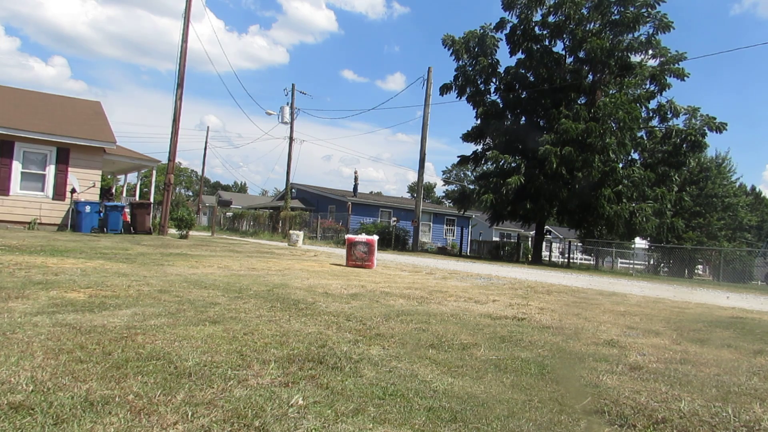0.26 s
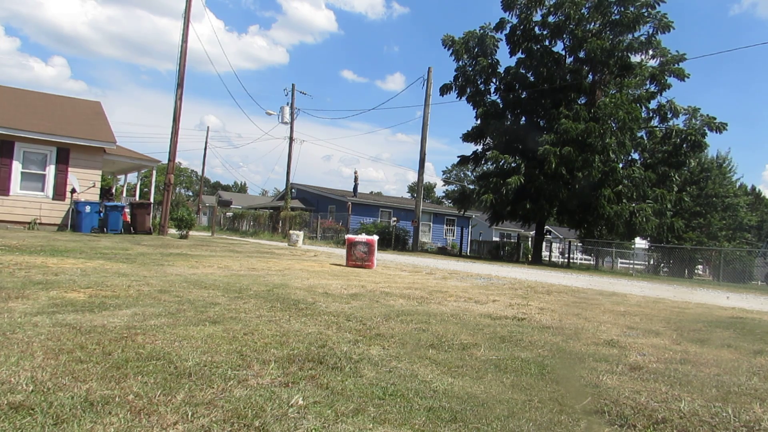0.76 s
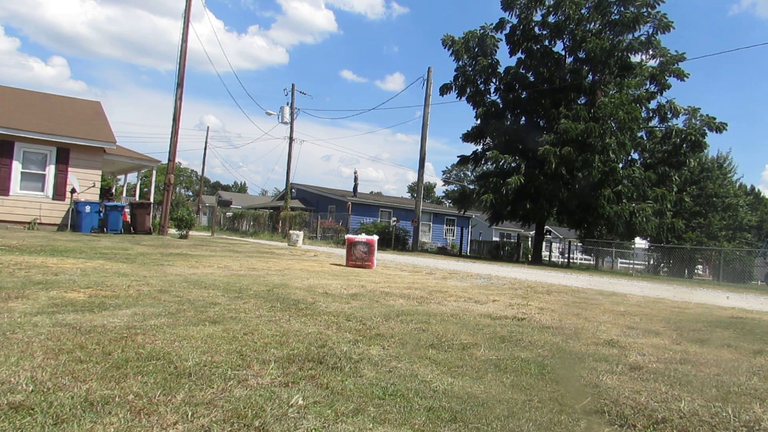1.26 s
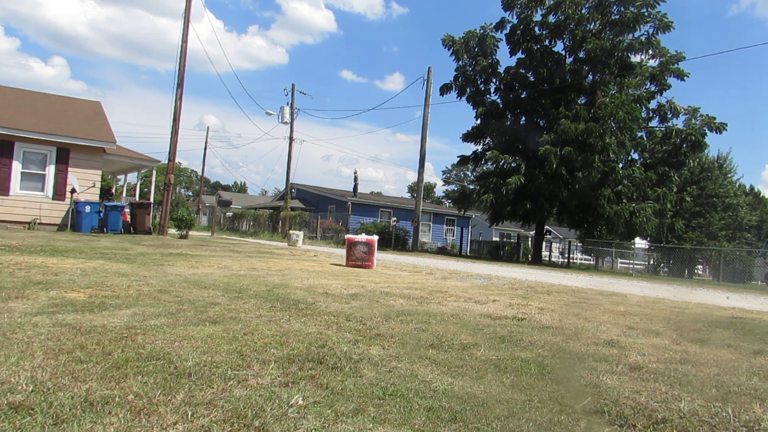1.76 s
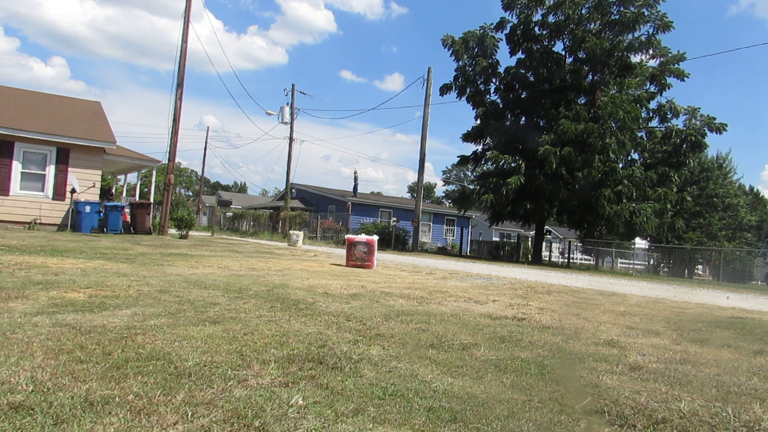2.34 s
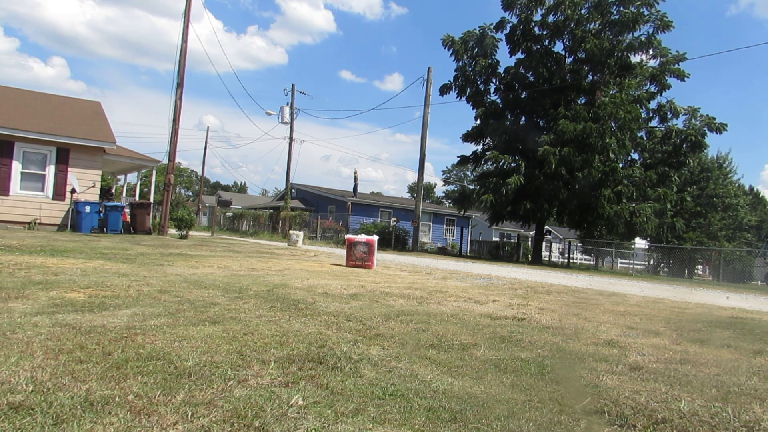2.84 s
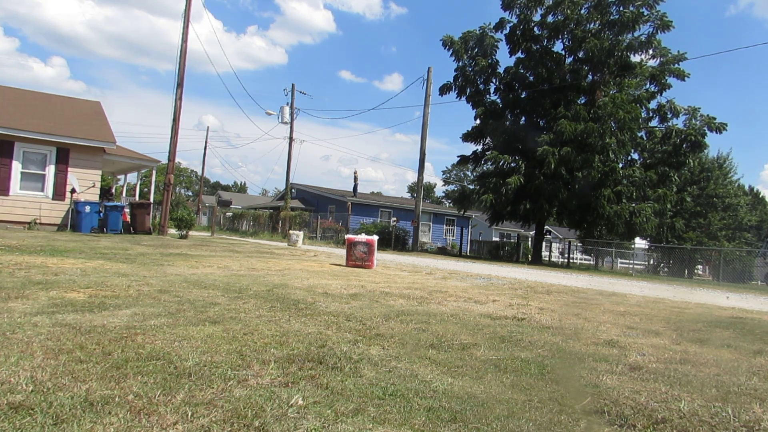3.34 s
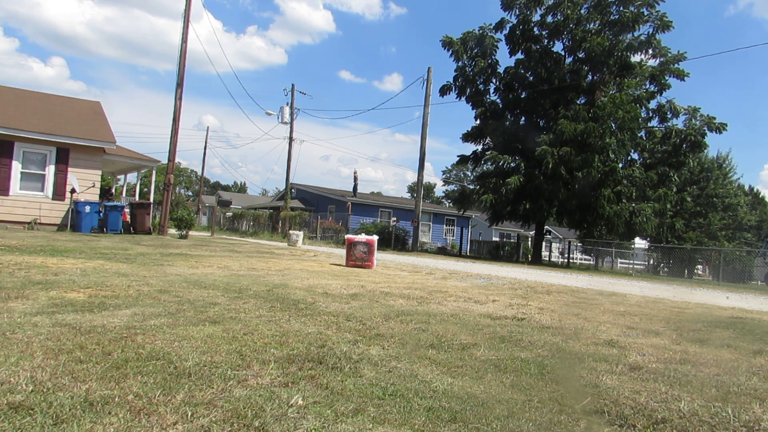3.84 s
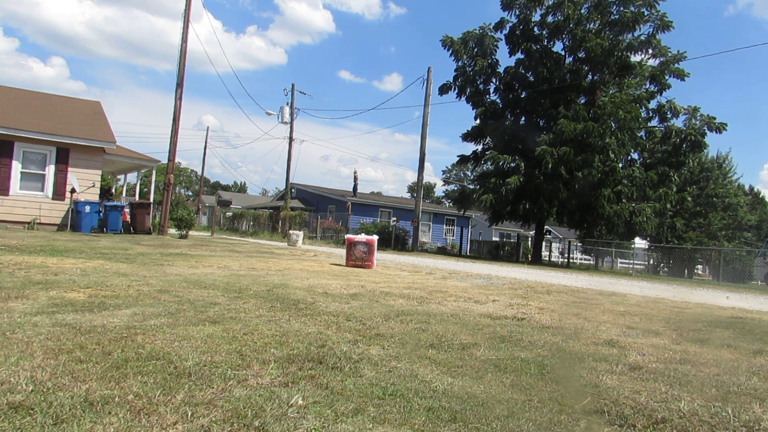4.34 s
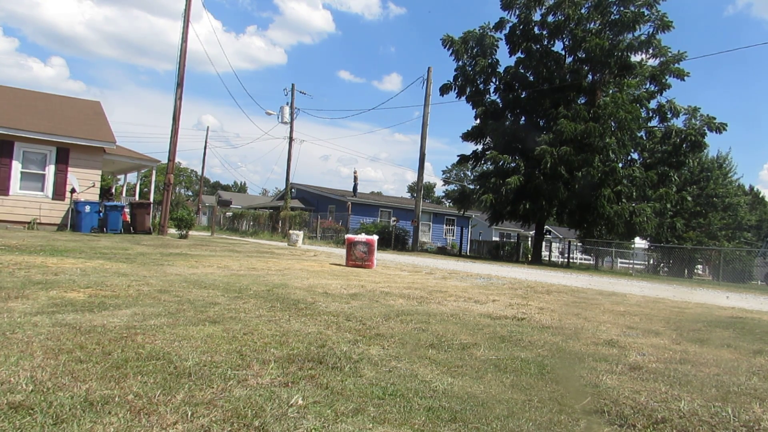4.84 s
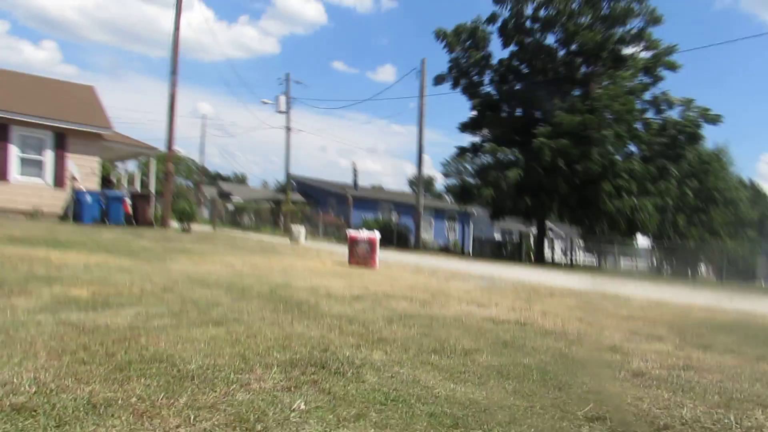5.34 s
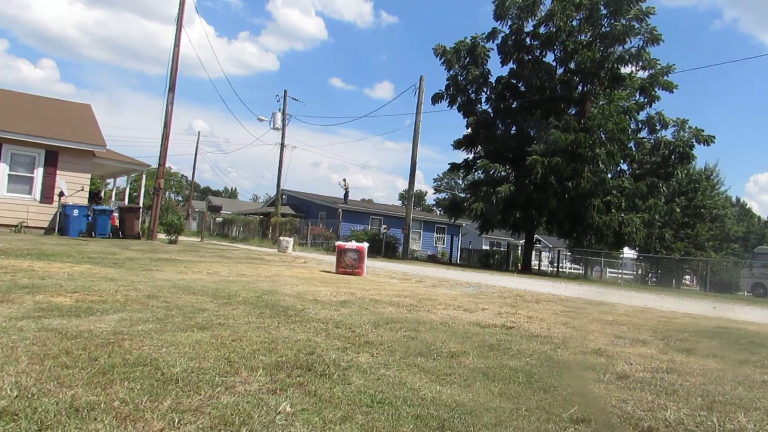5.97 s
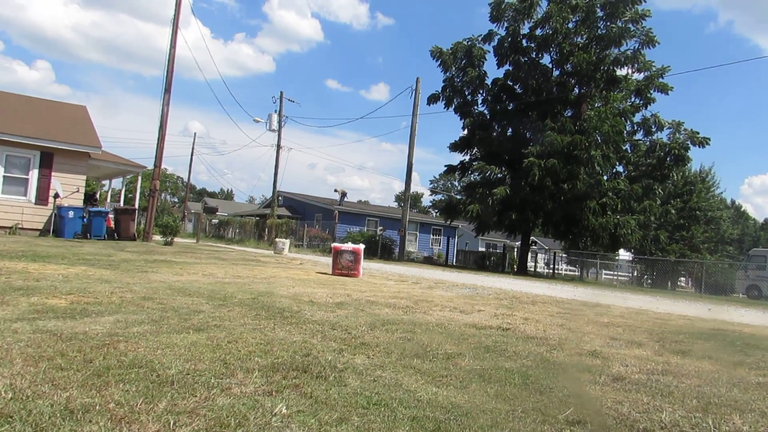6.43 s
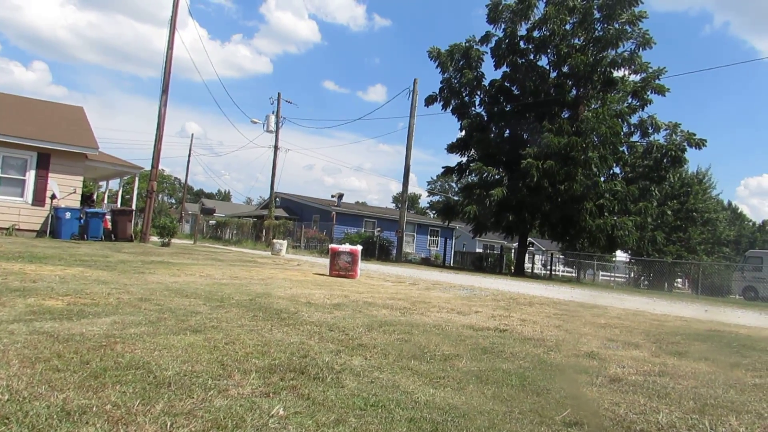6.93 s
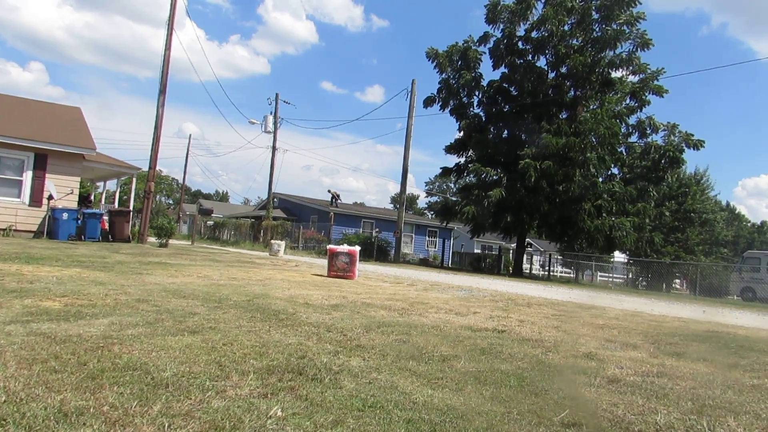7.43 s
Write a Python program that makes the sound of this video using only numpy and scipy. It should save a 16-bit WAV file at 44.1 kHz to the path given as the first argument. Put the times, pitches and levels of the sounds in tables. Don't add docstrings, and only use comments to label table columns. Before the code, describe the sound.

A grassy yard in summer: low wind rumble on the microphone, soft distant traffic, a wavering far hum, a few tiny bird whistles and a slowly rising cicada. Near five seconds a distant bow snaps, an arrow hisses closer and smacks loudly into a foam block beside the microphone, with quick slaps off walls. The background dips, then returns.

```python
import sys
import numpy as np
from scipy import signal
from scipy.fft import rfft, irfft
from scipy.io import wavfile
from scipy.ndimage import uniform_filter1d

SR = 44100
rng = np.random.default_rng(int(sys.argv[2]) if len(sys.argv) > 2 else 0)


def to_wav(s):
    ch = np.atleast_2d(s).T
    pcm = np.round(np.clip(ch, -1, 1) * 32767)
    wavfile.write(sys.argv[1], SR, pcm.astype(np.int16))


def undo_db(level):
    steps = np.asarray(level, float) / 20
    return 10 ** steps


N = 339564

HIT_S = 5.255


def evened(x):
    return x / np.sqrt(np.mean(x ** 2) + 1e-20)


def read(points, hz):
    f, value = np.transpose(points)
    return np.interp(np.log(hz + 1), np.log(f + 1), value)


def curve(rows, column):
    rows = np.array(rows)
    return np.interp(np.arange(N) / SR, rows[:, 0], rows[:, column])


def add(mix, s, sound):
    part = mix[:, round(s * SR):][:, :sound.shape[-1]]
    part += sound[..., :part.shape[1]]


def coloured(db_of, size):
    hz = np.fft.rfftfreq(size, 1 / SR)
    white = rng.standard_normal((2, size))
    return evened(irfft(rfft(white) * undo_db(db_of(hz)), size))


def slow(top_hz, count):
    z = rfft(rng.standard_normal((count, 1024)))
    keep_slow = np.exp(-(np.fft.rfftfreq(1024, .01) / top_hz) ** 2)
    return evened(irfft(z * keep_slow, 1024))


def field(spectrum, patchy_db):
    # pitch_hz, likeness (1 = the same)
    likeness = [(60, 0.88), (130, 1), (290, 0.7), (640, 0.32), (1410, 0.86), (3100, 0.89), (6820, 0.62),
                (15000, 0.19)]
    # pitch_hz, left_over_right_db
    side_lean = [(60, -1.5), (180, 1), (550, -0.69), (1650, -2.5), (4970, 0.4), (15000, -2)]
    # pitch_hz, lead_rad
    left_lead = [(0, 0), (4000, .1), (8000, .5), (12000, 1.9), (16000, 2.8)]
    frames, hz = N // 256 + 5, np.fft.rfftfreq(1024, 1 / SR)
    a, b, c, d, patches = rng.standard_normal((frames, 513, 5)).T
    patches = uniform_filter1d(patches, size=10, axis=0)
    patches = evened(uniform_filter1d(patches, size=14, axis=1))
    same = np.clip(read(likeness, hz), -1, 1)[:, None]
    left = a + 1j * b
    right = same * left + np.sqrt(1 - same ** 2) * (c + 1j * d)
    right = right * np.exp(-1j * read(left_lead, hz))[:, None]
    lean = undo_db(read(side_lean, hz) / 2)[:, None]
    colour = undo_db(read(spectrum, hz)[:, None] + patchy_db * patches)
    z = np.array([left * lean, right / lean]) * colour
    return evened(signal.istft(z, nperseg=1024, noverlap=768)[1][:, :N])


def wind():
    # pitch_hz, level_db
    rumble = [(12, -45), (20, -30), (48, 9.5), (86, 9), (130, 5), (200, -49)]
    # time_s, level_db
    gusts = [(0.0, -46), (0.22, -36), (0.48, -43), (1.0, -35.5), (1.2, -43.5), (1.42, -37), (2.2, -39.5),
             (2.65, -45.5), (3.1, -42.5), (3.4, -41), (3.9, -38), (4.35, -44), (5.0, -40), (5.45, -38),
             (6.75, -42), (6.92, -53), (7.08, -37), (7.7, -46.5)]
    noise = evened(coloured(lambda hz: read(rumble, hz), N)[0])
    return undo_db(curve(gusts, column=1)) * noise


def traffic():
    # pitch_hz, level_db
    roar = [(100, -19), (146, -7.5), (234, -17.5), (262, -18.5), (446, -24.5), (1030, -24.5), (1500, -30.5),
            (2670, -40.5), (7520, -47.5), (10000, -52.5), (14700, -56), (15300, -64), (16000, -72)]
    t = np.arange(N) / SR
    sway_s, strongest_s = 5.07, 3.28
    sway_db = 0.52 * np.cos(2 * np.pi * (t - strongest_s) / sway_s)
    return undo_db(-46.5 + sway_db + 5.5) * field(roar, patchy_db=0.5)


def fan():
    # top_s, level_db, length_s
    swells = [(0.138, -36, 0.17), (0.66, -37, 0.44), (1.035, -37, 0.22), (1.333, -38.5, 0.12),
              (1.648, -33.5, 0.45), (2.04, -34.5, 0.17), (2.316, -37, 0.54), (2.644, -34, 0.26),
              (2.947, -34.5, 0.26), (3.392, -35, 0.39), (3.753, -38, 0.35), (4.04, -39, 0.16),
              (4.265, -39, 0.29), (4.58, -39.5, 0.6), (5.042, -44.5, 0.59), (5.392, -39, 0.33),
              (5.67, -38, 0.13), (5.926, -40, 0.39), (6.27, -41.5, 0.34), (6.554, -34.5, 0.098),
              (6.766, -39.5, 0.2), (7.23, -42.5, 0.51), (7.565, -37.5, 0.095)]
    t = np.arange(N) / SR
    hum_hz, waver_width_hz, motor_hz = 117.2, 5.01, 1404
    waver = np.interp(t * 100, np.arange(1024), slow(6., count=1)[0])
    turn = 2 * np.pi * np.cumsum(hum_hz + waver_width_hz / 2 * waver) / SR
    step = t[::64]
    swell = undo_db(-58)
    for s, db, length in swells:
        swell = swell + undo_db(db) * np.exp(-(2.53 * (step - s) / length) ** 2)
    tone = np.sin(turn) + undo_db(-17.5) * np.sin(2 * turn)
    hum = np.sqrt(2) * np.interp(t, step, swell) * tone
    motor = np.sqrt(2) * undo_db(-64.5) * np.sin(2 * np.pi * motor_hz * t + .05 * turn % 1)
    return hum + motor


def cicada():
    # time_s, click_rate_hz, lag_cycles (second drum's lag past half a cycle)
    clicks = [(1, 241.5, .002), (3, 241.8, .004), (4.3, 242.6, .016), (5.2, 243, .016), (6.6, 244.1, .015),
              (7.3, 244.7, .014), (7.7, 244.9, .002)]
    # pitch_hz, level_db
    drum = [(3600, -8), (4400, -3.5), (5200, -7), (6200, 0), (8200, -2), (9400, -3.5), (10400, -10)]
    # time_s, length_s, harmonic, line (1 = its throb line), level_db (over the drum colour)
    glints = [(3., 1.8, 16, 0, 10), (3.5, 1.5, 22, 0, 14), (4.3, 1.2, 35, 0, 9), (4.7, 1., 25, 0, 8),
              (4.75, 1., 33, 0, 8), (5.2, 2., 24, 1, 9), (5.6, .9, 24, 0, 8), (5.9, .6, 29, 0, 7),
              (6.8, 1.6, 18, 0, 7), (6.6, .8, 26, 0, 5), (6.7, .9, 19, 0, 6), (7.1, .5, 24, 1, 8),
              (7.2, .7, 28, 0, 9), (7.4, .6, 16, 0, 9), (7.62, .25, 22, 0, 9)]
    # time_s, level_db
    effort = [(0., -82), (1.8, -73), (2.7, -66.5), (4.1, -62), (4.6, -58.5), (7.7, -56)]
    step = np.arange(0, N, 32)
    step_s = step / SR
    rate, lag = curve(clicks, column=1), curve(clicks, column=2)[step]
    turn = 2 * np.pi * np.cumsum(rate) / SR
    throb = 2 * np.pi * 99 * np.arange(N) / SR
    fades, starts = slow(0.93, count=60), 2 * np.pi * rng.random(60)
    song = np.zeros(N)
    for k in range(15, 44):
        pair = np.sqrt(0.19 + np.cos(np.pi * k * (.5 + lag)) ** 2)
        for side, db in enumerate((0, -3.5)):
            row = 2 * (k - 15) + side
            fade = np.interp(step_s * 100, np.arange(1024), fades[row])
            glint = 0
            for s, length, order, line, boost_db in glints:
                if (round(order), round(line)) == (k, side):
                    glint = glint + undo_db(boost_db) * np.exp(-(2 * (step_s - s) / length) ** 4)
            gain = undo_db(read(drum, k * 243) + db) * np.maximum(undo_db(3.9 * fade) * pair, glint)
            song += np.repeat(gain, 32)[:N] * np.sin(k * turn + side * throb + starts[row])
    fuzz = coloured(lambda hz: read([(2500, -60)] + drum + [(14000, -13)], hz), N)
    near = evened(song) + .35 * fuzz[0]
    late = np.roll(near, 1) * .5 + near * .5
    both = np.array([near, undo_db(2.0) * late]) + 0.33 * fuzz[1] * [[1], [-1]]
    return undo_db(curve(effort, column=1) + 1.0) * both


def whistles(chirps):
    out = np.zeros((2, N))
    for s, length, start_hz, end_hz, db, echo_db in chirps:
        hz = np.linspace(start_hz, end_hz, round(length * SR))
        hz = hz * (1 + .012 * np.sin(2 * np.pi * 160 * np.arange(len(hz)) / SR))
        note = np.sqrt(2) * undo_db(db) * np.sin(2 * np.pi * np.cumsum(hz) / SR)
        note = note * np.hanning(len(hz)) ** .5
        taps = rng.standard_normal((2, 4000)) * (rng.random((2, 4000)) < .04)
        tail = taps * undo_db(-60 * np.arange(4000) / SR / 0.42)
        echo = signal.fftconvolve(note[None], tail / np.linalg.norm(tail[0]), axes=1)
        add(out, s, note)
        add(out, s + 0.009, undo_db(echo_db) * echo)
    return out


def birds():
    # start_s, lead_hz, gap_s, main_level_db
    high_bird = [(1.022, 9100, 0.017, -51.5), (2.16, 9100, 0.018, -53), (3.258, 10050, 0.01, -48.5)]
    mid_bird = [(3.66, 6400, 0.034, -55.5), (5.414, 6300, 0.025, -53), (5.945, 6570, .025, -51.5),
                (7.655, 6400, .025, -53)]
    # length_s, start_hz, end_hz, echo_db
    high_call = [
        (0.027, .055, -9, 1),
        (0.019, 8150, 7800, 1),
    ]
    mid_call = [
        (.032, .035, -3, -2),
        (.02, 6100, 5710, 2),
    ]
    # start_s, start_hz, end_hz, level_db
    low_bird = [(6.625, 2420, 2300, -59), (6.652, 2350, 2640, -52), (6.682, 2110, 2690, -50.5),
                (6.72, 2250, 2450, -60)]
    # start_s, length_s, start_hz, end_hz, level_db
    far_birds = [(3.22, 0.028, 5700, 5650, -61), (5.45, .08, 2250, 2170, -58),
                 (7.105, .03, 5120, 5330, -62), (7.14, .035, 5050, 5400, -64),
                 (7.575, .015, 6800, 6500, -66)]
    chirps = []
    for calls, (lead, main) in ((high_bird, high_call), (mid_bird, mid_call)):
        for s, hz, gap, db in calls:
            chirps.append((s, lead[0], hz, hz * (1 - lead[1]), db + lead[2], lead[3]))
            chirps.append((s + gap, *main[:3], db, main[3]))
    for s, start_hz, end_hz, db in low_bird:
        chirps.append((s, 0.0193, start_hz, end_hz, db, 1))
    chirps += [(*row, -9) for row in far_birds]
    return whistles(chirps)


def rings(modes):
    out, t = np.zeros((2, N)), np.arange(8000) / SR
    for s, hz, db, t60, swing in modes:
        onset = 1 - np.exp(-4 * hz * t)
        ring = np.sign(swing) * undo_db(db - 60 * t / t60) * np.sin(2 * np.pi * hz * t) * onset
        add(out, s, ring * undo_db(np.array([[.6], [-.6]])))
    return out


def bursts(rows, spectrum):
    out, hz = np.zeros((2, N)), np.fft.rfftfreq(8192, 1 / SR)
    for s, db, t60, tilt, same, rise_share in rows:
        rise = min(rise_share * t60, 0.0048)
        t = np.arange(8192) / SR - 2 * rise
        colour_db = read(spectrum, hz) + tilt * np.log2(hz / 4000 + 0.013)
        a, b = coloured(lambda _: colour_db, 8192)
        tick = irfft(undo_db(colour_db) * np.exp(-4j * np.pi * hz * rise))
        a = a + undo_db(11.5) * tick / tick.max()
        same = np.clip(same, -1, 1)
        shape = np.where(t < 0, np.exp(-2 * (t / rise) ** 2), undo_db(-60 * t / t60))
        both = np.array([a, same * a + np.sqrt(1 - same ** 2) * b])
        add(out, s - 2 * rise, undo_db(db) * shape * both)
    return out


def bow():
    # peak_s, level_db, decay_s (to -60 dB), tilt_db_per_octave
    snaps = [(4.809, -48, 0.018, 7), (4.8127, -31, 0.0153, -1), (4.82, -38, .015, 3),
             (4.828, -40.5, 0.23, -1.5), (4.848, -55, 0.015, 5.), (4.8755, -47, .012, 1)]
    # pitch_hz, level_db
    string = [(470, -3), (900, 1), (3000, -11), (5200, -8), (7000, -8), (10000, -9), (13000, -16),
              (16000, -30)]
    # start_s, pitch_hz, level_db, decay_s (to -60 dB), swing (1 = push, -1 = pull)
    limbs = [(4.777, 61.3, -14.5, 0.072, 1), (4.8127, 604, -20, 0.008, 1), (4.822, 88, -14, 0.061, 1)]
    # start_s, length_s, start_hz, end_hz, level_db
    squeak = [(4.822, .008, 5440, 4900, -53)]
    cracks = bursts([(*row, .95, 0.0334) for row in snaps], string)
    scrape = whistles([(*row, 8) for row in squeak])
    return cracks + rings(limbs) + scrape


def flight():
    # time_s, level_db
    hiss = [(4.8, -71), (4.812, -35), (4.844, -50), (4.96, -58), (5.198, -43), (5.236, -35), (5.248, -27),
            (5.25, -22)]
    # pitch_hz, level_db
    feathers = [(1500, 9), (3000, 8), (6000, 9), (10000, 8), (15500, 6.5)]
    t = np.arange(N) / SR
    flying = (t > hiss[0][0]) & (t < HIT_S)
    air = coloured(lambda hz: read(feathers, hz), N)[0]
    return air * undo_db(curve(hiss, column=1) - 8.0) * flying


def slaps():
    # peak_s, level_db, decay_s (to -60 dB), tilt_db_per_octave
    echoes = [(5.282, -34, .01, 6.), (5.2868, -9.5, .011, 1.5), (5.2945, -28, .02, -2.),
              (5.3005, -26, .018, -2.), (5.305, -26, .03, -4.), (5.3095, -22, .035, -3.),
              (5.318, -31, .035, -4.), (5.33, -26, .04, -4.), (5.351, -23, .028, -1.5),
              (5.3595, -23, .018, -2.), (5.37, -38, .06, -6.)]
    # pitch_hz, level_db
    wall = [(470, -16), (800, -9), (1900, -9), (2730, 1), (3500, -10), (5110, -14), (6910, -5), (8550, -14),
            (10400, -11), (16000, -22)]
    first_same, late_same, widening_s = .15, 0.56, 0.0073
    rows = []
    for row in echoes:
        delay = row[0] - echoes[0][0]
        same = late_same + (first_same - late_same) * np.exp(-delay / widening_s)
        rise_share = 0.026 + 2.7 * delay
        rows.append((*row, same, rise_share))
    lean_db = np.array([[.5], [-.5]]) * -0.5
    return bursts(rows, wall) * undo_db(lean_db)


def smack():
    # peak_s, level_db, decay_s (to -60 dB), tilt_db_per_octave
    hits = [
        (5.2546, -12, .012, .5),
        (5.2575, -24, .015, 0.),
        (5.2635, -33, .016, -1.),
    ]
    # pitch_hz, level_db
    crack = [(470, 1), (800, -9), (1500, -14), (2300, 0), (3100, -9.5), (3930, -5), (4860, -6), (5440, -15),
             (7260, -10), (10300, -20), (11300, -9), (16000, -30)]
    # start_s, pitch_hz, level_db, decay_s (to -60 dB), swing (1 = push, -1 = pull)
    block = [(5.256, 139, 1.5, .08, 1), (5.2521, 221, 1., .052, 1), (5.25455, 510, 2.5, .012, -1),
             (5.2528, 756, -5.5, .024, -1)]
    return bursts([(*row, 0.89, 0.0895) for row in hits], crack) + rings(block)


def scene():
    yard = wind() + traffic() + fan()
    animals = cicada() + birds()
    shot = bow() + flight() + slaps() + smack()
    return yard + animals + shot


def band_limit(x):
    return signal.sosfilt(signal.butter(12, 16370, fs=SR, output="sos"), x)


def record(dry):
    t = np.arange(N) / SR
    whine = np.sqrt(2) * undo_db(-74) * np.sin(2 * np.pi * 15734.3 * t)
    whine *= .25 + abs(np.sin(np.pi * (t - .018) / .074)) ** .7
    since = np.maximum(t - HIT_S, 0)
    grip = 1 - np.exp(-(since / .011) ** 2)
    duck_db = -15. * grip * np.exp(-(since / 0.86) ** 0.87)
    clipped = np.clip((dry + whine) * undo_db(duck_db), -.98, .98)
    edge = signal.firwin(511, 15900, fs=SR)
    mix = signal.oaconvolve(clipped, edge[None], "same")
    return band_limit(mix)


dry = scene()
out = record(dry)
to_wav(out)
```